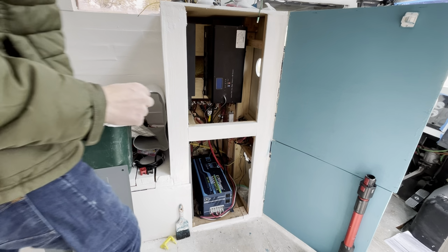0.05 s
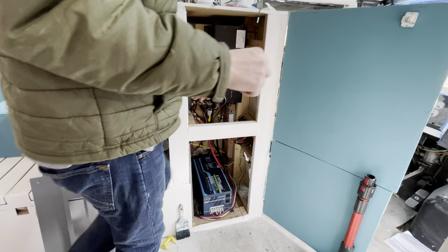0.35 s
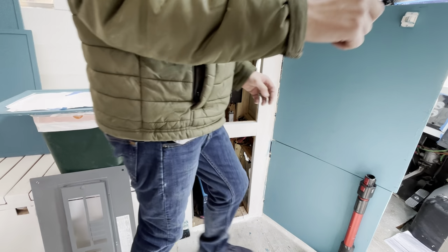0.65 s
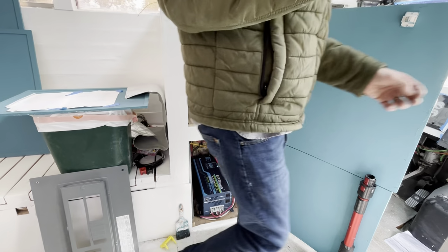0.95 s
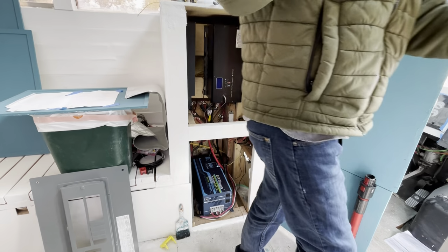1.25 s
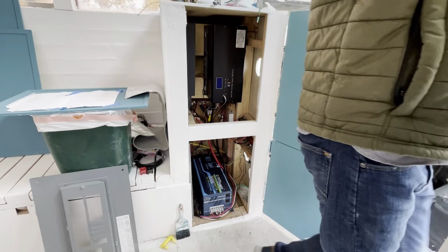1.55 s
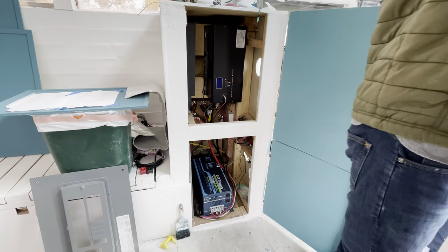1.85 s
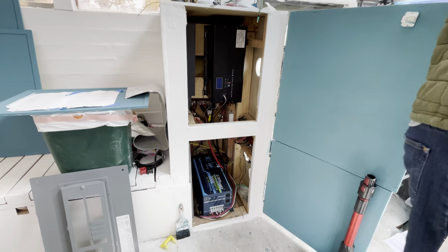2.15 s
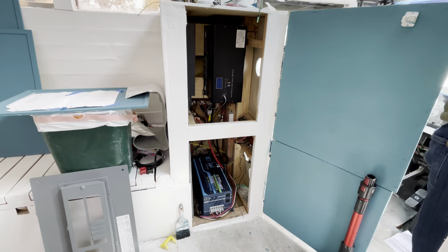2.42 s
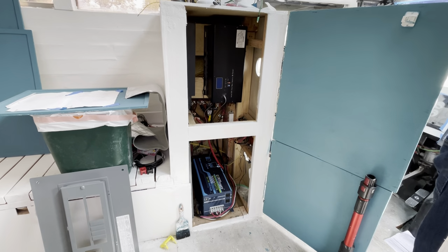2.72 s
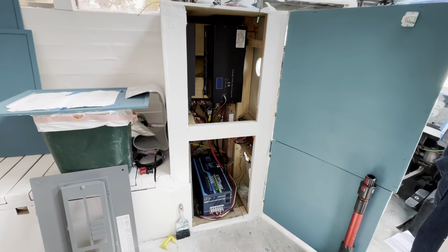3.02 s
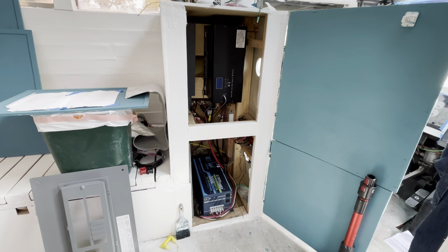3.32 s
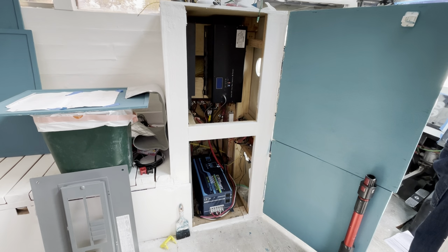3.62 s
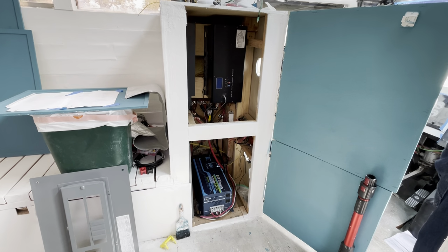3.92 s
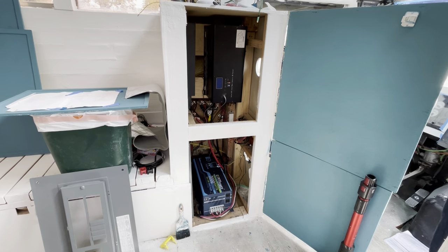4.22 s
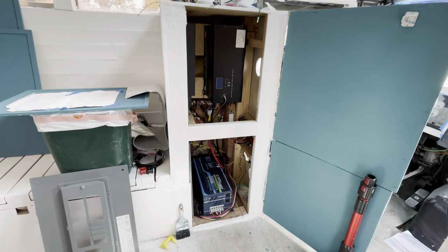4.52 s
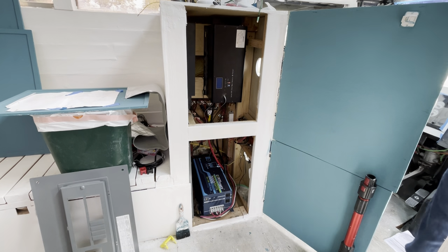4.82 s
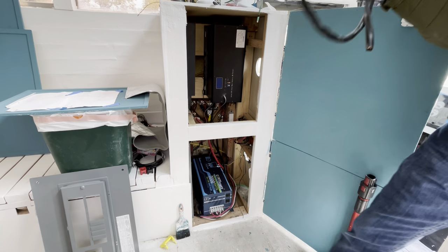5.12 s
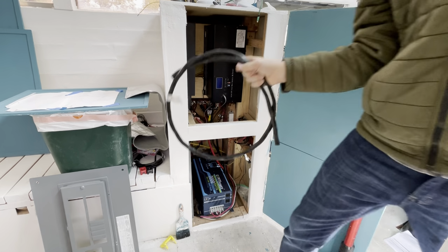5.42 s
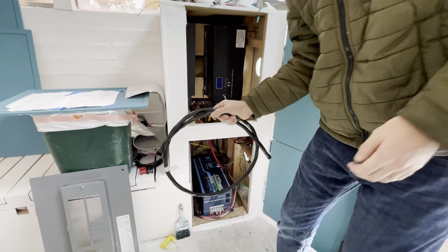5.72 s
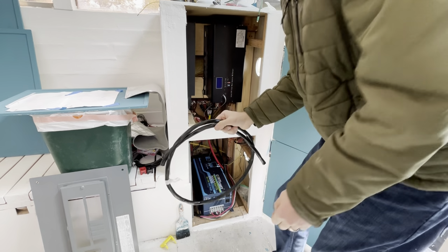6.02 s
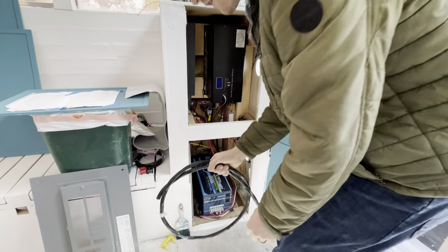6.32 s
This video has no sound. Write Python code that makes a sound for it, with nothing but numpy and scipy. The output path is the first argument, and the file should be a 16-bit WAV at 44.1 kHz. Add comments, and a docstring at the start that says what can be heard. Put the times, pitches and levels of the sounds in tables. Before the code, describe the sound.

A man moves close to the microphone in a cramped room with a faint low hum. For the first 1.5 seconds his shoes thump and scuff on a hollow wooden floor, heaviest at about 0.7 seconds, with soft brushing of jeans and a nylon jacket. From 1.8 seconds, off to the right, a hard object knocks lightly, then at about 2.15 lands in a quick cluster of briefly ringing clunks, the loudest moment. A stiff cable scrapes and crackles over piled gear, with tugs around 2.3 and 3 seconds, ending near 3.5. Small parts tap sharply and a few more steps thud beneath it. From 3.6 to 5.2 seconds it is quieter: faint ticks, shuffles and cloth rubbing. He then walks back, with steps at 5.3, 5.9 and 6.1 seconds, scuffing soles, swishing clothes and the very faint rub of the coiled cable in his hand.

```python
"""A cramped room with a hollow wooden floor, crossed by a man in a quilted jacket.
Off to the right he shifts a hard object, which clunks and rings edge after edge, and drags a stiff
cable out of a pile of gear: the sheath rubs in tiny slips, ends and small parts tap.
He walks back with the coil. Heels and toes thump the boards, soles scuff, denim brushes
and the nylon shell hisses, over a low hum of room air."""
import sys
import numpy as np
from scipy import signal
from scipy.fft import rfft, irfft, next_fast_len
from scipy.io import wavfile
from scipy.ndimage import map_coordinates

SR = 44100
rng = np.random.default_rng(int(sys.argv[2]) if len(sys.argv) > 2 else 0)


def digitize_waveform(pressure):
    """Quantize a signal to 16-bit integers and store it at the path in sys.argv[1].

    Rows of a 2-D input are taken as channels; values are limited to [-1, 1].
    """
    field = np.atleast_2d(pressure).T
    bounded = np.clip(field, -1, 1)
    quanta = np.round(bounded * 32767).astype(np.int16)
    wavfile.write(sys.argv[1], SR, quanta)


N = 280467
N_FFT, N_TAIL = next_fast_len(N), SR // 2
TIME_S = np.arange(N) / SR

# Room reverberation. Each row: frequency in Hz, t60 in seconds.
ROOM_DECAY = [(60, 1), (200, 0.38), (700, 0.25), (2500, 0.36), (8000, 0.26), (15000, 0.043)]
# Sound field. Each row: frequency in Hz, left-right correlation.
COHERENCE = [(60, 0.88), (220, 0.94), (500, 0.17), (1000, 0.58), (2000, 0.028), (5000, 0.031), (14000, 0.6)]
# Noise colours of the sources. Each row: frequency in Hz, spectral density in dB.
AIR_SPECTRUM = [(25, -21), (42, -7), (56, 8), (85, -5.5), (140, -9), (300, -23.5), (700, -24.5),
                (1700, -32), (4000, -40), (15000, -54)]
COIL_SPECTRUM = [(900, -24), (1350, -16), (1600, 0), (2000, -1), (2500, -19), (4000, -27)]
DENIM_SPECTRUM = [(120, -3.5), (220, 0), (330, 7), (520, -5.5), (1050, -3), (1500, -0.5), (1950, -5.5),
                  (2400, -9), (3200, -16.5), (6000, -18.5)]
NYLON_SPECTRUM = [(1200, -30), (2200, 2.5), (3200, 3.5), (5000, 1), (8500, -3.5), (11000, 1.5), (13000, 0),
                  (15000, -3)]
THUD_SPECTRUM = [(40, 6.5), (130, 2.5), (330, -3.5), (600, -12), (1000, -9.5), (2000, -10), (6000, -65)]
SCUFF_SPECTRUM = [(200, -26), (600, 3), (1800, 0.5), (3200, -5.5), (6000, -6), (9500, -5.5), (15000, -12)]
DRAG_SPECTRUM = [(120, -3.5), (250, -10.5), (400, -6), (700, -7.5), (1000, -3), (1600, -4), (2400, -1.5),
                 (3300, -4), (6400, -3), (7600, -2), (8250, -3.5), (10300, -5), (13500, -11),
                 (16000, -16.5)]
CLATTER_SPECTRUM = [(60, -5), (200, -9), (400, 1.5), (750, -5.5), (1100, -4.5), (1800, -1), (2700, -5.5),
                    (5000, -8), (9000, -8), (15000, -17)]
# Strides, turns and reaches. Each row: middle and half-length in seconds, denim and nylon levels in dB.
BODY_MOVES = [(0.02, 0.39, -59.5, -60.5), (0.526, 0.35, -66, -63), (0.864, 0.073, -52.5, -55.5),
              (1.002, 0.16, -59, -61), (1.462, 0.064, -62, -60.5), (1.663, 0.085, -62.5, -63.5),
              (1.968, 0.1, -47, -60), (3.253, 0.24, -60.5, -58), (3.86, 0.11, -59, -78),
              (4.012, 0.066, -55, -58), (4.201, 0.26, -57.5, -67), (4.655, 0.13, -61.5, -78),
              (4.95, 0.38, -58.5, -68.5), (5.369, 0.17, -49.5, -48), (5.8, 0.19, -49.5, -50),
              (6.095, 0.17, -50, -64), (6.35, 0.068, -50.5, -55.5)]
# Sweeps of cloth or a sole. Each row: middle and half-length in seconds, level in dB, centre in Hz,
# glide in octaves per half-length.
SWEEPS = [(0.264, 0.045, -54, 945, 0.3), (0.485, 0.083, -51, 1100, 0.69), (1.521, 0.091, -55, 677, -0.27),
          (1.679, 0.09, -53, 1240, 0.79), (2.939, 0.033, -47, 580, 0), (4.296, 0.043, -45, 1470, 0.0083),
          (5.48, 0.055, -47.5, 5800, 0.36), (5.472, 0.065, -51, 2100, -0.043),
          (6.051, 0.045, -48.5, 4000, -0.64), (6.329, 0.027, -61, 4500, -0.37)]
# Shoes on the floor. Each row: start in seconds, heel level in dB, contact cut-off in Hz,
# scuff level in dB, toe delay in seconds.
FOOTFALLS = [(0.001, -29.5, 290, -56, 0.05), (0.451, -48, 1100, -63, 0.028),
             (0.711, -40.5, 500, -59, 0.025), (0.734, -19, 427, -47, 0.033),
             (1.271, -29.5, 347, -44, 0.043), (1.548, -49.5, 400, -65, 0.024),
             (1.941, -21.5, 207, -59, 0.032), (2.052, -31.5, 350, -46.5, 0.045),
             (2.098, -24, 230, -59, 0.03), (2.411, -29.5, 187, -48.5, 0.029), (2.629, -34, 124, -58, 0.026),
             (3.702, -42, 480, -53, 0.0303), (4.162, -35, 91, -66, 0.017), (5.28, -23.5, 1800, -50, 0.071),
             (5.875, -26, 900, -36, 0.025), (6.053, -35.5, 616, -48, 0.037),
             (6.145, -28.5, 346, -59, 0.034)]
# Modes of the hollow floor and the hard object. Each row: frequency in Hz, level in dB, t60 in seconds.
BOARD_RING = [(68.2, -15, 0.45), (84.3, -18.5, 0.72), (136, -7, 0.27), (171, -4.5, 0.26), (243, -8.5, 0.13),
              (303.7, -5, 0.17), (346, -2, 0.095), (484, -4.5, 0.091), (585, -11.5, 0.21),
              (672, -6.5, 0.11), (900, 2.5, 0.018)]
OBJECT_RING = [(85.1, -9, 0.47), (165.2, -14.5, 0.41), (240, -14, 0.45), (357, -3.5, 0.19), (403, 1, 0.076),
               (466, -18, 0.14), (565, -5.5, 0.1), (613, -7, .15), (835, -9.5, 0.17), (960, -46.5, 0.18),
               (1068, -7, 0.15), (1110, -39, 0.13), (1316, -17, 0.38), (1535, -15, 0.13), (1440, -46, .25),
               (1525, -9, 0.29), (1880, -41, 0.244), (1800, -5, 0.065), (1840, -30, 0.054),
               (2118, 5, 0.058), (2380, -23, 0.14)]
# Pulls on the cable. Each row: middle and half-length in seconds, rubbing level in dB.
CABLE_TUGS = [(2.275, 0.076, -30.5), (2.417, 0.051, -35.5), (2.554, 0.14, -44.5), (2.954, 0.22, -37),
              (3.297, 0.064, -42.5)]
# Cable ends and small parts. Each row: start in seconds, level in dB, centre in Hz, t60 in seconds.
PART_TAPS = [(1.794, -53.5, 2600, 0.051), (1.858, -33, 3030, 0.041), (1.9067, -34.5, 2840, 0.061),
             (1.995, -46.5, 3020, 0.043), (2.054, -44, 4930, 0.047), (2.089, -45, 5000, 0.028),
             (2.304, -25.5, 6100, 0.028), (2.312, -23.5, 5480, 0.015), (2.4215, -29, 4280, 0.028),
             (2.5352, -25, 2824, 0.043), (3.285, -37, 3120, .08), (3.468, -38, 2330, 0.09),
             (3.673, -48.5, 5400, 0.15), (3.901, -39, 6900, 0.013), (4.174, -53, 4500, 0.14),
             (4.247, -56, 4000, 0.23), (4.277, -46.5, 1260, 0.24), (4.75, -63, 4200, 0.31)]
# The object bumps and rocks. Each row: start in seconds, level in dB, contact cut-off in Hz.
OBJECT_BLOWS = [(1.795, -38.5, 1290), (1.857, -26, 1790), (1.908, -23.5, 1480), (2.1379, -19, 3000),
                (2.1445, -11.5, 3490), (2.1492, -17.5, 4900), (2.153, -11, 3420), (2.165, -14.5, 1510),
                (2.175, -9.5, 800), (2.209, -29, 2000), (2.916, -34.5, 700)]
# Stereo balance of the pile. Each row: frequency in Hz, left minus right in dB.
PILE_BALANCE = [(50, -2), (130, -4), (280, -5), (500, -5), (950, -1), (2000, 2.5), (4300, 3.5), (8000, 2),
                (12000, 0)]
# Microphone port peaks and dips. Each row: centre in Hz, width in Hz, gain in dB.
LEFT_PORT_EQ = [(3100, 500, -2), (5100, 500, 2.5), (5600, 400, -6), (6600, 600, 2), (7400, 400, -6),
                (8000, 500, 3), (9800, 1300, -5)]
RIGHT_PORT_EQ = [(3300, 900, -3), (5550, 500, -8), (6500, 500, 2), (7400, 600, -9), (8400, 900, 4),
                 (10700, 900, -2)]
# Reverberation bands. Each row: centre in Hz, band-pass filter.
EDGES_HZ = np.geomspace(30, 18000, 10)
ROOM_BANDS = [(np.sqrt(low * high), signal.butter(2, [low, high], "band", fs=SR, output="sos"))
              for low, high in zip(EDGES_HZ, EDGES_HZ[1:])]


def from_db(db):
    return 10 ** (np.asarray(db) / 20)


def unit_rms(x):
    return x / np.sqrt(np.mean(x ** 2) + 1e-20)


def at_hz(curve, hz):
    curve_hz, values = np.array(curve).T
    return np.interp(np.log(hz), np.log(curve_hz), values)


def bins_hz(size):
    return np.maximum(np.fft.rfftfreq(size, 1 / SR), 1)


def add(track, start_s, sound):
    start = max(0, round(start_s * SR))
    track[:, start:start + sound.shape[1]] += sound[:, :N - start]


def low_pass(x, cutoff_hz, order=2):
    return signal.sosfilt(signal.butter(order, min(cutoff_hz, 0.45 * SR), fs=SR, output="sos"), x)


def resonate(x, resonances):
    """Adds narrow peaks and dips."""
    for hz, width_hz, db in resonances:
        x = x + (from_db(db) - 1) * signal.lfilter(*signal.iirpeak(hz, hz / width_hz, fs=SR), x)
    return x


def from_right(x, turn_hz):
    """Sound from the right reaches the left port late, by up to half a cycle above turn_hz."""
    pole = np.exp(-2 * np.pi * turn_hz / SR)
    return np.array([signal.lfilter([-pole, 1], [1, -pole], x[0] + 1e-18), x[1]])


def decay(t60_s):
    return np.exp(-np.log(1000) * TIME_S[:N_TAIL] / t60_s)


def rub_level(base_db, moves, abruptness=3.1):
    """Each move speeds up and slows down in a bell over a steady base; the rubbings add in power."""
    power = from_db(base_db) ** 2
    for middle_s, half_s, db in moves:
        bell = (1 + ((TIME_S - middle_s) / half_s) ** 2 / abruptness) ** -abruptness
        power = power + (from_db(db) * bell) ** 2
    return np.sqrt(power)


def noise(spectrum, size=N_TAIL):
    """Coloured stereo noise, alike on both sides in the bass; rms 1."""
    hz = bins_hz(size)
    mid, side = rfft(rng.standard_normal((2, size)))
    coherence = np.clip(at_hz(COHERENCE, hz), 0, 1)
    pair = np.sqrt(1 + coherence) * mid + np.sqrt(1 - coherence) * side * [[1], [-1]]
    rumble_cut = hz ** 2 / (hz ** 2 + (spectrum[0][0] / 2) ** 2)
    return unit_rms(irfft(pair * from_db(at_hz(spectrum, hz)) * rumble_cut, size))


def burst(spectrum, t60_s, room_db):
    """A contact with its first reflections, then the room's tail, dying band by band."""
    sources = noise(spectrum), noise(spectrum)
    tail = sum(signal.sosfilt(sos, sources[k % 2]) * decay(at_hz(ROOM_DECAY, hz))
               for k, (hz, sos) in enumerate(ROOM_BANDS))
    return noise(spectrum) * decay(t60_s) + from_db(room_db) * tail


def struck(modes, vary_db):
    """Each blow rings the modes with new strengths; short waves reach the two sides out of step."""
    out = np.zeros((2, N_TAIL))
    for k, (hz, db, t60_s) in enumerate(modes):
        skew_rad = rng.normal() * np.sqrt(np.clip(1 - at_hz(COHERENCE, hz), 0, 1))
        phase_rad = 2 * np.pi * hz * TIME_S[:N_TAIL] + [[skew_rad], [-skew_rad]]
        strength = (-1) ** k * from_db(db + vary_db * rng.normal())
        out += strength * decay(t60_s) * np.sin(phase_rad)
    return out / 2


def friction(spectrum, slips_per_s, spread_db, t60_s, room_db):
    """Tiny slips of uneven size, each a short burst from one of four touching spots; rms 1."""
    slips = (rng.random(N) < slips_per_s / SR) * rng.choice([-1, 1], N)
    slips = slips * from_db(spread_db * np.minimum(rng.exponential(1, N), 4))
    spot = rng.integers(0, 4, N)
    rubbing = sum(signal.oaconvolve((slips * (spot == k))[None], burst(spectrum, t60_s, room_db), axes=1)
                  for k in np.unique(spot))
    return unit_rms(rubbing[:, :N])


def room_air():
    """Steady low hum of the room."""
    return from_db(-59) * noise(AIR_SPECTRUM, N_FFT)[:, :N]


def coil(pick_up_s=4.34, grip_s=0.085, start_db=-71.5, approach_db_per_s=4):
    """The coiled cable rubs in the hand: a faint, hollow hiss that grows as it is carried nearer."""
    held_s = np.maximum(TIME_S - pick_up_s, 0)
    level = np.minimum(held_s / grip_s, 1) * from_db(start_db + approach_db_per_s * held_s)
    return level * noise(COIL_SPECTRUM, N_FFT)[:, :N]


def clothes(denim_rest_db=-65.5, nylon_rest_db=-69):
    """Never quite still: denim brushes with two hollow resonances, the jacket's shell hisses."""
    denim_level = rub_level(denim_rest_db, [(s, half_s, db) for s, half_s, db, _ in BODY_MOVES])
    nylon_level = rub_level(nylon_rest_db, [(s, half_s, db) for s, half_s, _, db in BODY_MOVES])
    denim = friction(DENIM_SPECTRUM, slips_per_s=4500, spread_db=4, t60_s=0.02, room_db=-17)
    denim = unit_rms(resonate(denim, [(760, 90, 4), (1700, 260, 2)]))
    nylon = friction(NYLON_SPECTRUM, slips_per_s=9000, spread_db=0.5, t60_s=0.0025, room_db=-23.5)
    return from_right(denim_level * denim + nylon_level * nylon, turn_hz=800)


def swishes():
    """Single rubs swell and fade; the pitch of the hiss follows the rubbing speed."""
    out = np.zeros((2, N))
    for middle_s, half_s, db, hz, glide_oct in SWEEPS:
        spectrum = [(hz / 5, -15), (hz / 1.6, -7), (hz, 0),
                    (hz * 1.33, -8), (hz * 1.9, -14), (hz * 8, -34)]
        stroke = np.linspace(-1, 1, round(2 * half_s * SR))
        travel = np.cumsum(2 ** (glide_oct * stroke))
        hiss = np.array([map_coordinates(side, [travel], order=3, mode="wrap")
                         for side in noise(spectrum)])
        add(out, middle_s - half_s, from_db(db) * hiss * np.cos(stroke * np.pi / 2) ** 2)
    return from_right(out, turn_hz=900)


def boards(contact_hz):
    """A soft blow on the hollow floor: a thud and the ring of the boards."""
    thud = from_db(-11) * burst(THUD_SPECTRUM, t60_s=0.07, room_db=-6)
    return low_pass(struck(BOARD_RING, vary_db=2.5) + thud, contact_hz)


def footsteps(toe_loss_db=6, toe_max_hz=264, firm_roll_s=0.04, roll_db_per_s=96):
    """The heel thumps, the sole scuffs, the toe follows; a longer roll brings down more weight."""
    out = np.zeros((2, N))
    for start_s, heel_db, contact_hz, scuff_db, roll_s in FOOTFALLS:
        scuff = burst(SCUFF_SPECTRUM, t60_s=0.32, room_db=0) * (1 - decay(0.023))
        add(out, start_s, from_db(heel_db) * boards(contact_hz) + from_db(scuff_db) * scuff)
        toe_db = heel_db - toe_loss_db + roll_db_per_s * (roll_s - firm_roll_s)
        add(out, start_s + roll_s, from_db(toe_db) * boards(min(contact_hz, toe_max_hz)))
    return from_right(out, turn_hz=1100) * from_db([[-0.8], [0.8]])


def cable_drag(start_s=1.785, stop_s=3.56, fade_s=0.077, slide_db=-52):
    """The sheath rubs over the pile in dense slips and sparse crackling snags; tugs swell both."""
    moving = np.clip(np.minimum(TIME_S - start_s, stop_s - TIME_S) / fade_s, 0, 1)
    slips = friction(DRAG_SPECTRUM, slips_per_s=5000, spread_db=3, t60_s=0.024, room_db=-17.5)
    snags = friction(DRAG_SPECTRUM, slips_per_s=130, spread_db=3, t60_s=0.008, room_db=-22)
    return moving * rub_level(slide_db, CABLE_TUGS) * (slips + snags / 2)


def taps(ringing_tap_db=-27):
    """Small parts tap with a broad crack; the harder the tap, the more two close modes stand out."""
    out = np.zeros((2, N))
    for start_s, db, hz, t60_s in PART_TAPS:
        spectrum = [(hz / 12, -18), (hz / 2.6, -12), (hz / 1.1, -1),
                    (hz * 1.7, -3), (hz * 2.8, -7), (hz * 5, -19)]
        modes = [(hz * 0.94, 3, t60_s), (hz * 1.01, 3, t60_s)]
        ring = from_db(db - ringing_tap_db) * struck(modes, vary_db=1)
        crack = burst(spectrum, t60_s, room_db=-14)
        add(out, start_s, from_db(db) * (crack + ring))
    return out


def clunks():
    """The hard object lands on one edge after another, ringing and clattering."""
    out = np.zeros((2, N))
    for start_s, db, contact_hz in OBJECT_BLOWS:
        ring = from_db(-4.5) * struck(OBJECT_RING, vary_db=1.5)
        clatter = from_db(-3.5) * burst(CLATTER_SPECTRUM, t60_s=0.029, room_db=-5.5)
        blow = low_pass(ring, contact_hz) + low_pass(clatter, contact_hz, order=1)
        add(out, start_s, from_db(db) * blow)
    return out


def gear_pile():
    """Object, parts and cable off to the right; their bass leans right, their treble left."""
    pile = from_right(clunks() + taps() + cable_drag(), turn_hz=404)
    lean_db = at_hz(PILE_BALANCE, bins_hz(N_FFT))
    return irfft(rfft(pile, N_FFT) * from_db([lean_db / 2, -lean_db / 2]), N_FFT)[:, :N]


def scene():
    return gear_pile() + room_air() + footsteps() + swishes() + clothes() + coil()


def record(dry, narrow_above_hz=10900, cutoff_hz=15750):
    """Each microphone port colours its side; the top treble narrows to the centre, then is cut."""
    left, right = resonate(dry[0], LEFT_PORT_EQ), resonate(dry[1], RIGHT_PORT_EQ)
    mid, side = (left + right) / 2, (left - right) / 2
    low_side = np.convolve(side, signal.firwin(31, narrow_above_hz, fs=SR), "same")
    side = 0.14 * side + 0.86 * low_side
    top_cut = signal.ellip(12, 0.1, 90, cutoff_hz, fs=SR, output="sos")
    return signal.sosfilt(top_cut, [mid + side, mid - side])


dry = scene()
out = record(dry)
digitize_waveform(out)
```